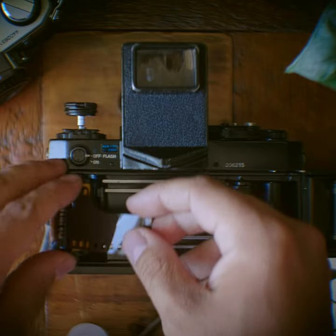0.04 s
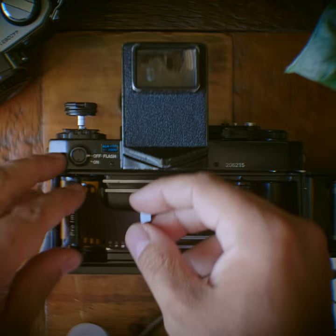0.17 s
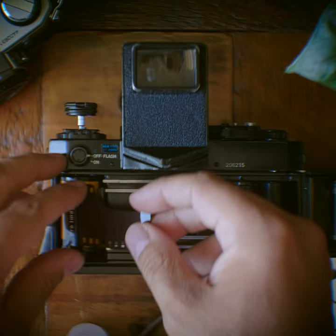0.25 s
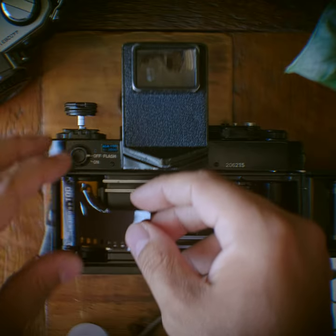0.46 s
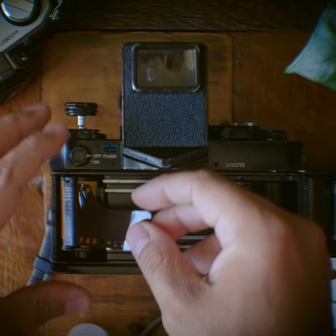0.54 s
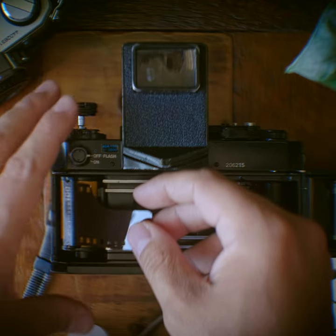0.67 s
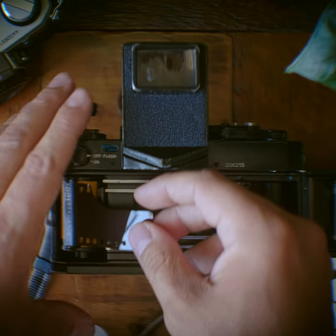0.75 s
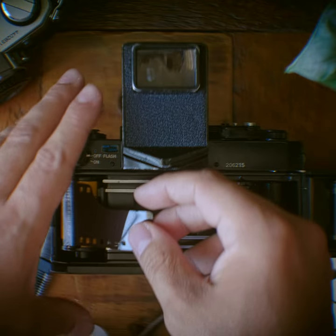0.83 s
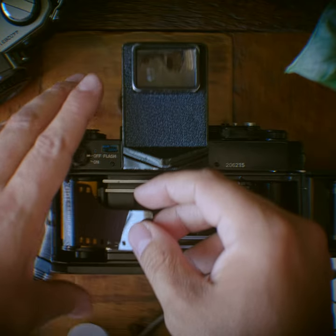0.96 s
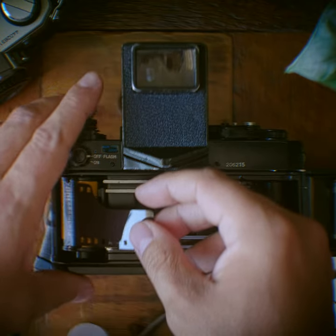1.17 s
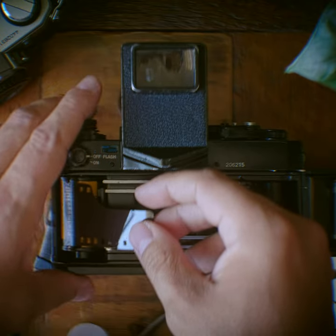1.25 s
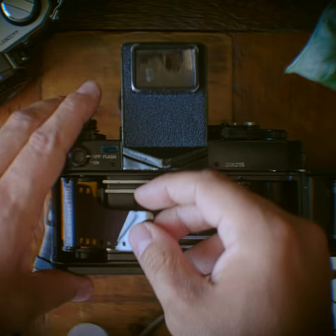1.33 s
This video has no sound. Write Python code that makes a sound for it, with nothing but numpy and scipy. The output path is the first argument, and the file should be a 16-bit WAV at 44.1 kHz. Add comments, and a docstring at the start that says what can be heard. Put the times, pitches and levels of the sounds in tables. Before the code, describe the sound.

Sharp metal clicks come from a film camera handled close by. After a dull finger tap at the start, the catch ticks twice and snaps home at 0.2 seconds, the loudest sound, thudding slightly into the wooden table. Fingers faintly tap and slide on the body from about 0.6 seconds. A lighter lever clicks at 1.2 seconds. Each click dies quickly in a small room with soft appliance hum.

```python
"""The metal catch of an open film camera ticks twice and snaps home; a lighter lever clicks 1 s later.
Each contact rings the metal for a few milliseconds, knocks the body and dies away in a small room.
The snap also thuds into the wooden table. Fingers tap and slide faintly on the shell.
Behind it: soft air noise and appliance hum."""
import sys
import numpy as np
from scipy import signal
from scipy.fft import rfft, irfft, next_fast_len
from scipy.io import wavfile

SR = 44100
rng = np.random.default_rng(int(sys.argv[2]) if len(sys.argv) > 2 else 0)


def wav_out(sig):
    """Save sig, one row per channel (or a flat mono array), as 16-bit PCM at SR to the path in sys.argv[1]."""
    wavfile.write(sys.argv[1], SR, np.round(np.clip(np.atleast_2d(sig).T, -1, 1) * 32767).astype(np.int16))


N = 61739

# room air spectrum: f/Hz, level/dB
AIR_SPECTRUM = [(25, -25), (45, -32), (80, -6.5), (150, -9), (220, -0.5), (330, -0.5), (480, -5.5),
                (700, -4), (1100, -8), (1650, -10), (2100, -14), (5000, -20.5), (9000, -23), (15500, -26),
                (16300, -47.5)]
# appliance tones: f/Hz, level/dB
HUM_TONES = [(296, -81), (366, -80), (1561, -80.5), (1733, -90.5)]
# room decay: f/Hz, t60/s
ROOM_DECAY = [(200, .35), (1000, 0.38), (3500, 0.49), (6500, 0.41), (10000, 0.33), (15000, 0.14)]
# reflection spectrum: f/Hz, level/dB
ROOM_SPECTRUM = [(200, 9), (1000, -1), (2300, -3.5), (4000, -2), (6500, -3.5), (8000, -9), (12000, -6),
                 (16000, -8.5)]
# finger taps: t/s, level/dB, f/Hz, knock/dB
FINGER_TAPS = [(.002, -44.5, 2407, 25), (0.0621, -54.5, 2460, 2), (0.1668, -42.5, 1040, 12),
               (.5624, -65.5, 2400, 0), (0.9455, -58.5, 2145, 1), (1.1085, -55.5, 2700, 6),
               (1.178, -54, 2800, 4.5)]
# finger slide envelope: t/s, level/dB
SLIDE_ENVELOPE = [(.6, -96.5), (.8, -77), (.95, -78.5), (1.12, -76.5), (1.2, -78.5)]
# finger slide spectrum: f/Hz, level/dB
SLIDE_SPECTRUM = [(2000, -20.5), (6000, -6), (9000, -4), (10500, -11.5), (15000, -18)]
# modes of table top, camera body, lever, catch: f/Hz, level/dB, t60/s
TABLE_MODES = [(165, -6.5, 0.041), (212, -3.5, 0.12), (292, -6, .07), (570, -3, .12), (674, 0, 0.072)]
BODY_MODES = [(208, -49.5, 0.19), (356.4, -34, 0.2), (611, -45.5, 0.27)]
LEVER_MODES = [(1360, -11.5, 0.015), (1960, -24, 0.017), (2530, -30.5, 0.023), (3210, -8, .014),
               (4100, -14, 0.0087), (4555, -7.5, 0.019), (5605, -12.5, 0.023), (5950, -7, 0.011),
               (6620, -1.5, 0.0092), (7290, -2.5, 0.008), (7950, -3, 0.01), (8860, -5.5, 0.0075),
               (11130, -6.5, 0.0073), (13040, -9, .005), (1070, -15, 0.031)]
CATCH_MODES = [(1504, -10.5, .011), (2186, -4, .012), (2428, -6.5, .011), (3278, -2, .01),
               (3980, -2.5, 0.0065), (4700, -6, .009), (5290, -11.5, .008), (6670, -7, 0.0078),
               (7250, -16.5, .008), (7570, -20, 0.013), (9514, -10.5, .007), (10070, -16, .007),
               (11450, -16, .007), (11940, -12.5, 0.0079)]
# contact noise spectra: f/Hz, level/dB
LEVER_CRACK = [(200, -40), (700, -7), (1200, -3.5), (3000, -1.5), (6000, 0.5), (9000, -12), (12500, -10),
               (16000, -32.5)]
CATCH_CRACK = [(200, -23), (700, -16.5), (1050, -16.5), (1300, -2), (4000, -2.5), (9000, -4), (12000, -8),
               (13500, -13), (15400, -12), (16200, -22.5)]
# metal contacts: t/s, level/dB, tilt/(dB/octave), crack/dB, knock/dB, room/dB
LEVER_HITS = [(1.1768, -59, -7.5, 5.5, 18, 4.5), (1.1927, -48.5, 5.5, 8, -15, -3.5),
              (1.2100, -17.5, 2, -3.5, 0, -8.5)]
CATCH_HITS = [(.1289, -37.5, -4, 5, 5.5, -7.5), (.1529, -31.5, -3.5, 0.5, 11.5, -6),
              (.1573, -38.5, 2.5, -1.5, -2, -15), (.1607, -43.5, -3, -1, 0.5, -12),
              (.2023, -7, 1, -7, -5.5, -13.5), (.2038, -12, 2, -1.5, -5.5, -9.5)]


def amp(db):
    """dB to gain."""
    return 10 ** (np.asarray(db) / 20)


def along(points, hz):
    """Interpolate (f/Hz, value) points over log frequency."""
    points_hz, values = np.transpose(points)
    return np.interp(np.log(hz + 1), np.log(points_hz + 1), values)


def filtered(x, gain):
    """Zero-phase filter by gain(hz)."""
    size = next_fast_len(len(x) + 8192)
    return irfft(rfft(x, size) * gain(np.fft.rfftfreq(size, 1 / SR)), size)[:len(x)]


def noise(shape_db, size):
    """Unit-rms noise shaped by shape_db(hz)."""
    x = filtered(rng.standard_normal(size), lambda hz: amp(shape_db(hz)))
    return x / x.std()


def fade(t, t60_s):
    """Exponential decay, 60 dB in t60_s."""
    return np.exp(-np.log(1000) * t / t60_s)


def rise(t, tau_s, power=1):
    """Onset from 0 to 1; S-shaped at power 2."""
    return 1 - np.exp(-(t / tau_s) ** power)


def ring(modes, t):
    """Damped sines of alternating sign."""
    return sum((-1) ** k * amp(db) * fade(t, t60_s) * np.sin(2 * np.pi * hz * t)
               for k, (hz, db, t60_s) in enumerate(modes))


def add(track, start_s, x):
    """Mix x into track at start_s."""
    i = max(0, round(start_s * SR))
    track[i:i + len(x)] += x[:len(track) - i]


def in_room(x, room_db, scatter_db=-1):
    """Direct sound plus wall reverberation and quick scatter off the table."""
    t = np.arange(len(x)) / SR
    bands_hz, frames_s, spectra = signal.stft(rng.standard_normal(len(x)), SR, nperseg=256)
    decay = fade(frames_s, along(ROOM_DECAY, bands_hz)[:, None])
    colour = amp(along(ROOM_SPECTRUM, bands_hz))[:, None]
    tail = signal.istft(spectra * decay * colour, SR)[1][:len(x)] * rise(t, tau_s=.004, power=2)
    scatter = noise(lambda hz: along(ROOM_SPECTRUM, hz), len(x))
    scatter *= fade(t, t60_s=.06) * rise(t, tau_s=.0055, power=2)
    response = tail / np.linalg.norm(tail) + amp(scatter_db) * scatter / np.linalg.norm(scatter)
    return x + amp(room_db) * .5 * signal.fftconvolve(x, response)[:len(x)]


def room_tone(air_db=-68):
    """Steady appliance hum and air noise."""
    t = np.arange(N) / SR
    hum = sum(np.sqrt(2) * amp(db) * np.sin(2 * np.pi * (hz * t + rng.random())) for hz, db in HUM_TONES)
    return hum + amp(air_db) * noise(lambda hz: along(AIR_SPECTRUM, hz), N)


def finger_slide():
    """Faint friction hiss on the shell."""
    level_db = np.interp(np.arange(N) / SR, *np.transpose(SLIDE_ENVELOPE))
    return amp(level_db) * noise(lambda hz: along(SLIDE_SPECTRUM, hz), N)


def finger_taps(half_width_oct=.51):
    """Dull taps on the shell: band-noise tick plus body knock."""
    out, t = np.zeros(N), np.arange(SR // 2) / SR
    onset = rise(t, tau_s=.001)
    knock = ring(BODY_MODES, t) * onset
    for start_s, db, centre_hz, knock_db in FINGER_TAPS:
        band_db = lambda hz: -10 * np.log10(1 + (np.log2((hz + 1) / centre_hz) / half_width_oct) ** 6)
        tick = noise(band_db, len(t)) * fade(t, t60_s=.03) * onset
        add(out, start_s, amp(db) * (in_room(tick, room_db=-7) + amp(knock_db) * knock))
    return out


def table_thud(start_s=.203, level_db=-47.5):
    """The hardest snap passes through the camera into the wooden top."""
    out, t = np.zeros(N), np.arange(SR // 2) / SR
    add(out, start_s, amp(level_db) * ring(TABLE_MODES, t) * rise(t, tau_s=.002))
    return out


def metal_clicks(hits, modes, crack_spectrum, rise_s, crack_t60_s, cutoff_hz=352):
    """Metal on metal: short ring and noise crack over a body knock."""
    out, t = np.zeros(N), np.arange(SR // 2) / SR
    onset = rise(t, rise_s)
    knock = ring(BODY_MODES, t) * onset
    bass_cut = signal.butter(1, cutoff_hz, "highpass", fs=SR)  # clicks carry little bass
    for start_s, db, tilt_db_per_oct, crack_db, knock_db, room_db in hits:
        tilt_db = lambda hz: tilt_db_per_oct * np.log2((hz + 200) / 4000)
        metal = ring([(hz, mode_db + tilt_db(hz), t60_s) for hz, mode_db, t60_s in modes], t)
        crack = noise(lambda hz: along(crack_spectrum, hz) + tilt_db(hz), len(t)) * fade(t, crack_t60_s)
        click = signal.lfilter(*bass_cut, (metal + amp(crack_db) * crack) * onset)
        add(out, start_s, amp(db) * (in_room(click, room_db) + amp(knock_db) * knock))
    return out


def scene():
    """Catch, lever, table and fingers over room tone; mono."""
    catch = metal_clicks(CATCH_HITS, CATCH_MODES, CATCH_CRACK, rise_s=.0003, crack_t60_s=.012)
    lever = metal_clicks(LEVER_HITS, LEVER_MODES, LEVER_CRACK, rise_s=.00031, crack_t60_s=.026)
    return (catch + lever + table_thud() + finger_taps() + finger_slide() + room_tone())[None]


def record(dry):
    """Steep low-pass."""
    cutoff_hz = 16300
    return filtered(dry[0], lambda hz: 1 / np.sqrt(1 + (hz / cutoff_hz) ** 200))[None]


dry = scene()
out = record(dry)
wav_out(out)
```